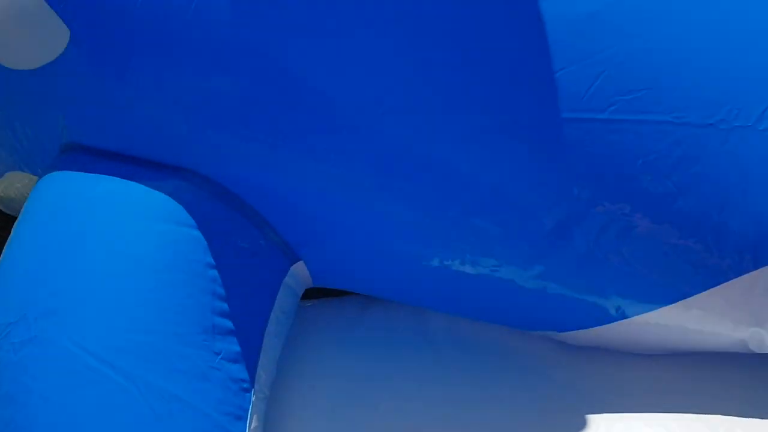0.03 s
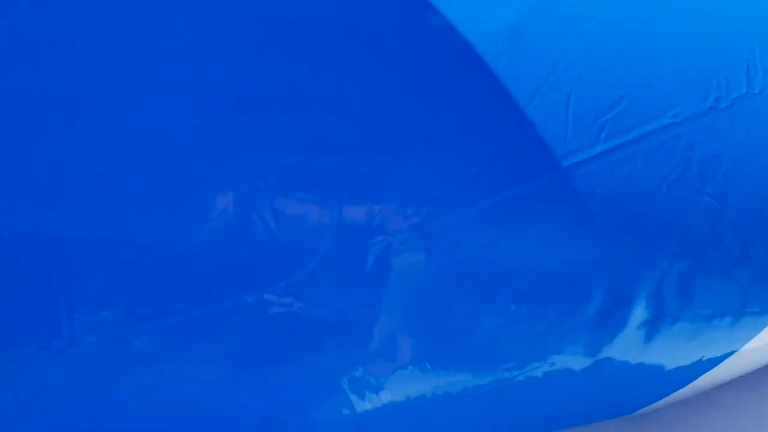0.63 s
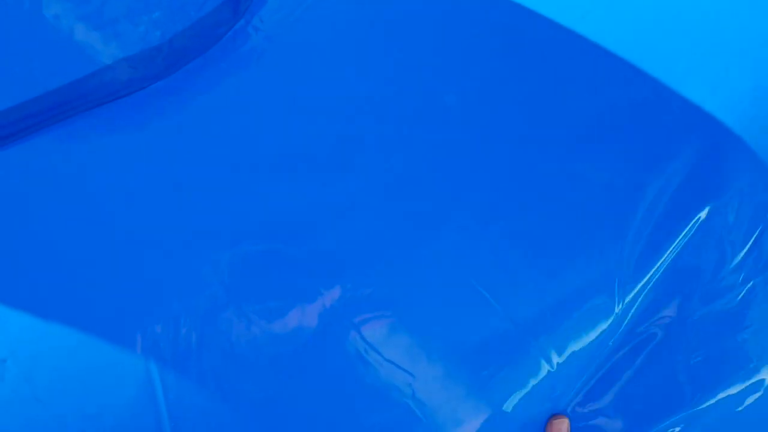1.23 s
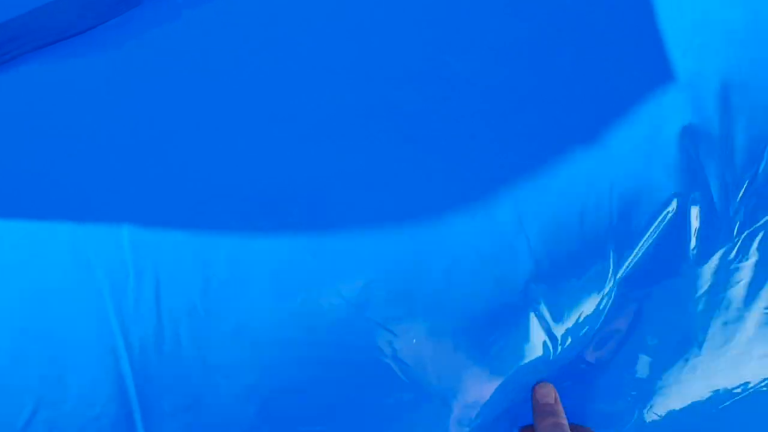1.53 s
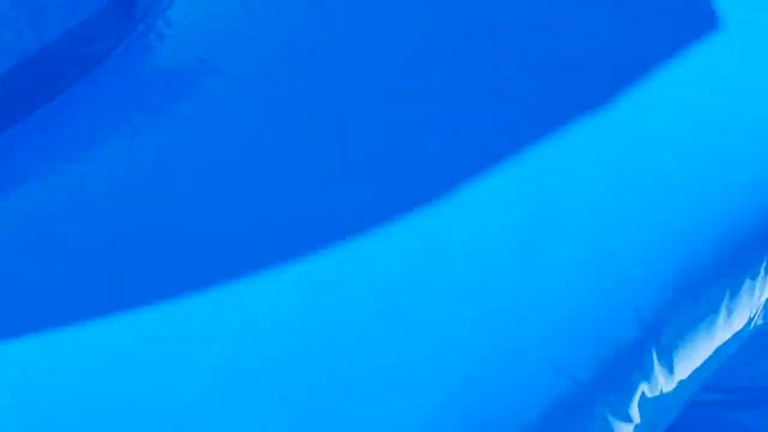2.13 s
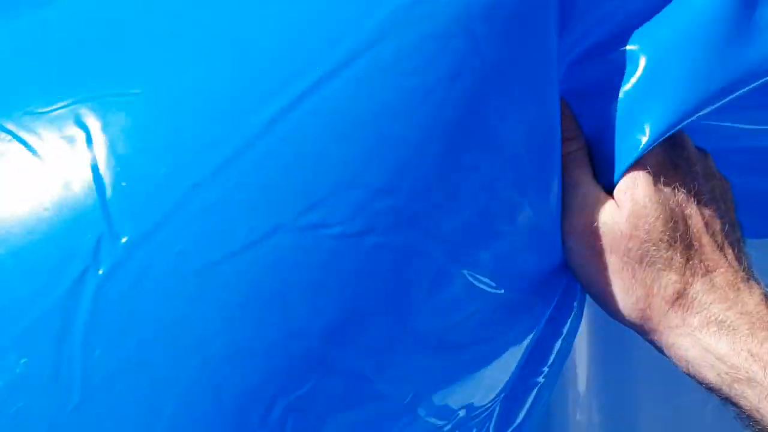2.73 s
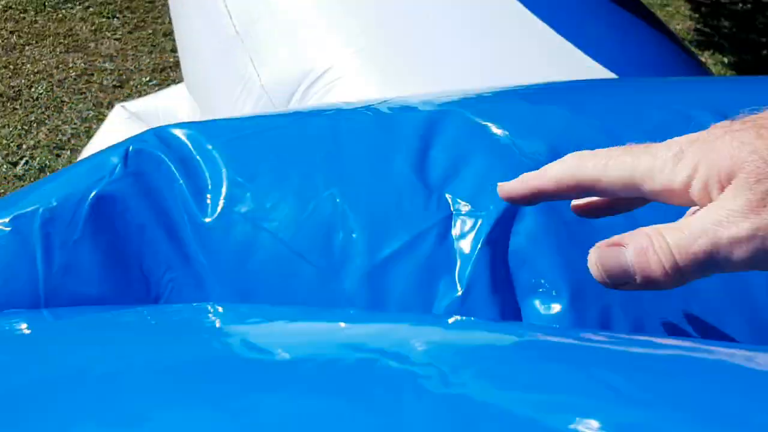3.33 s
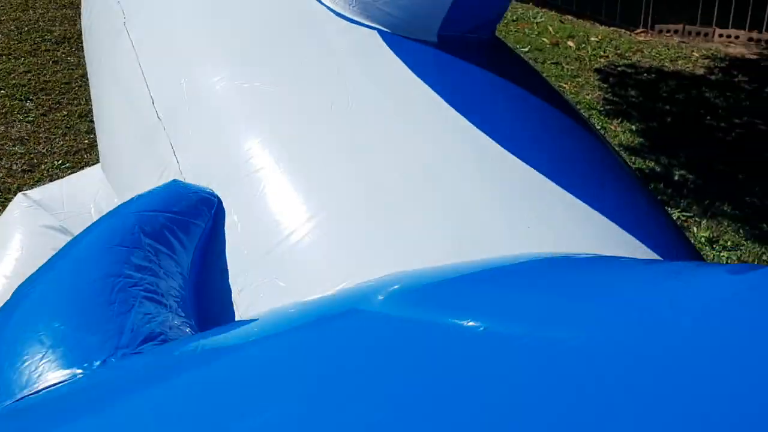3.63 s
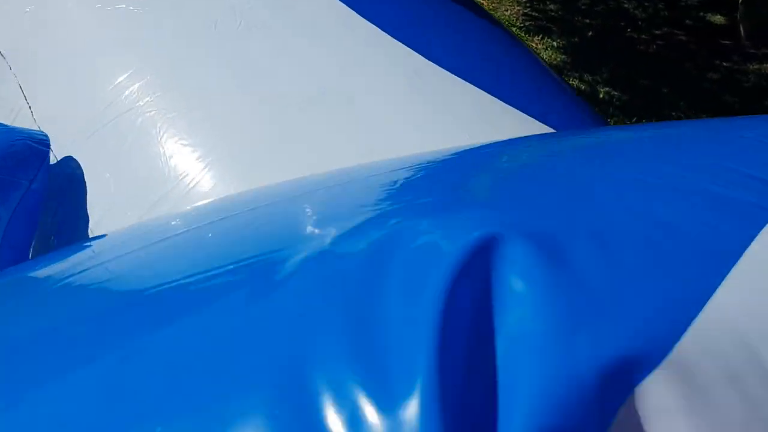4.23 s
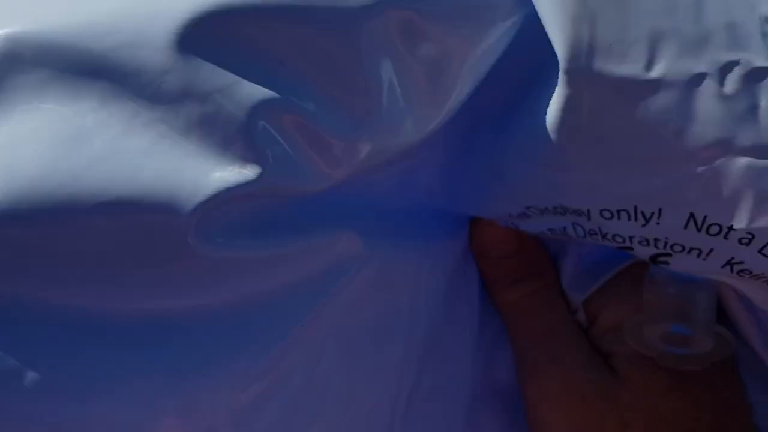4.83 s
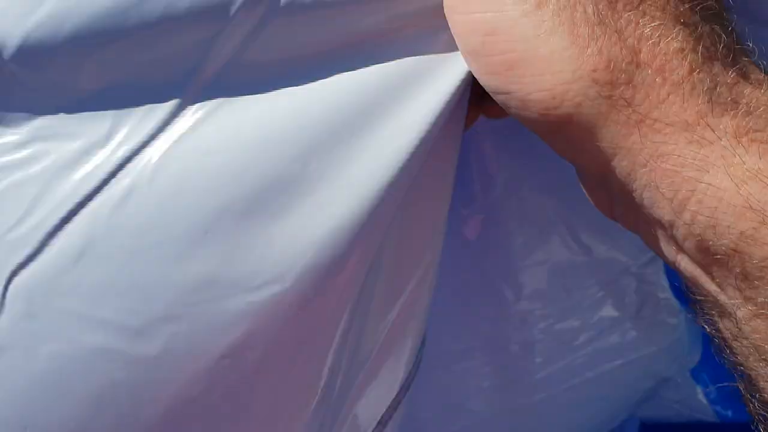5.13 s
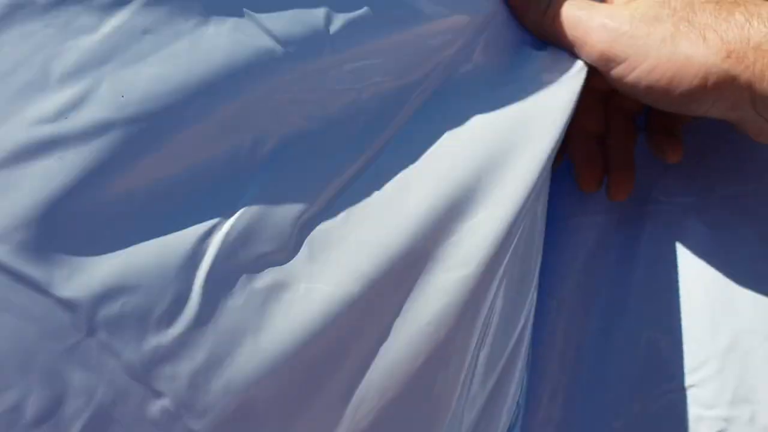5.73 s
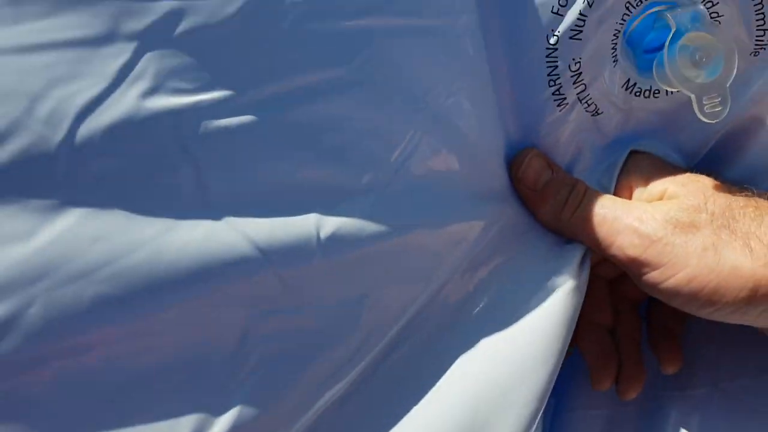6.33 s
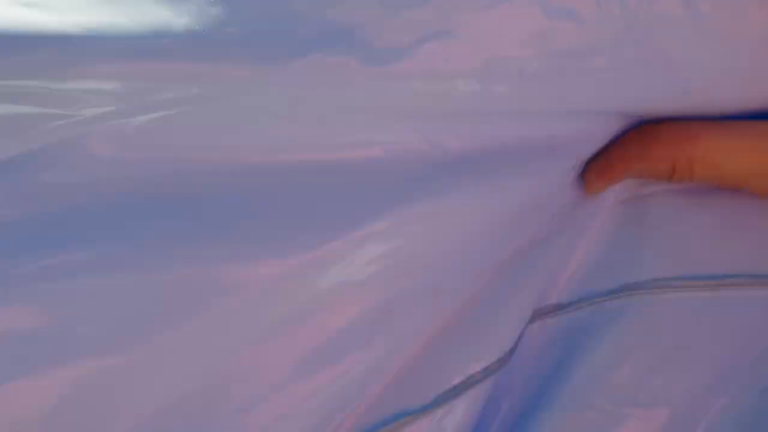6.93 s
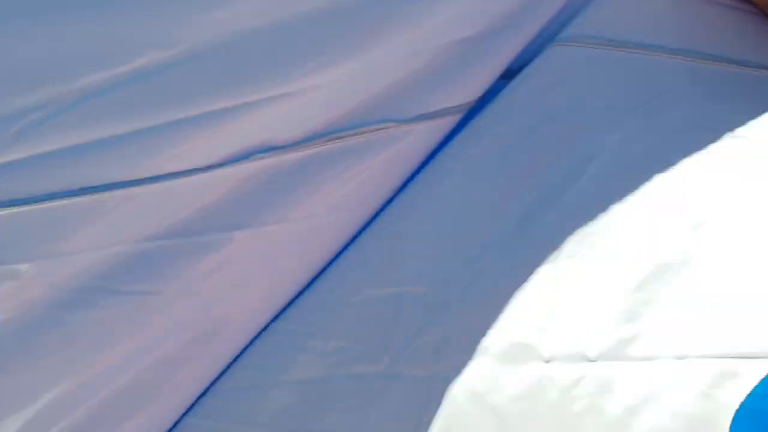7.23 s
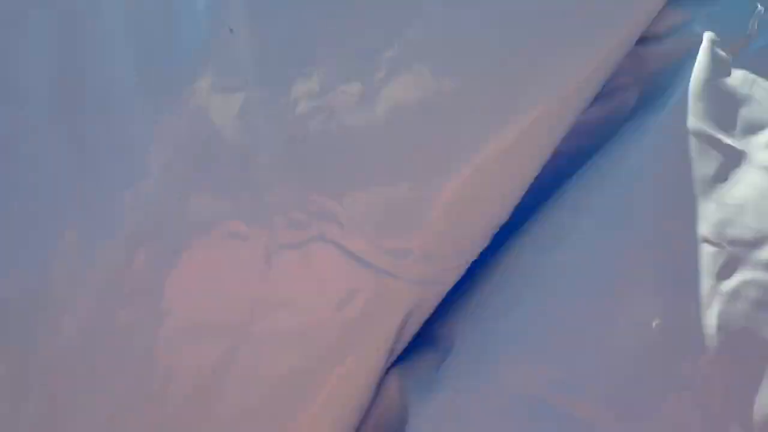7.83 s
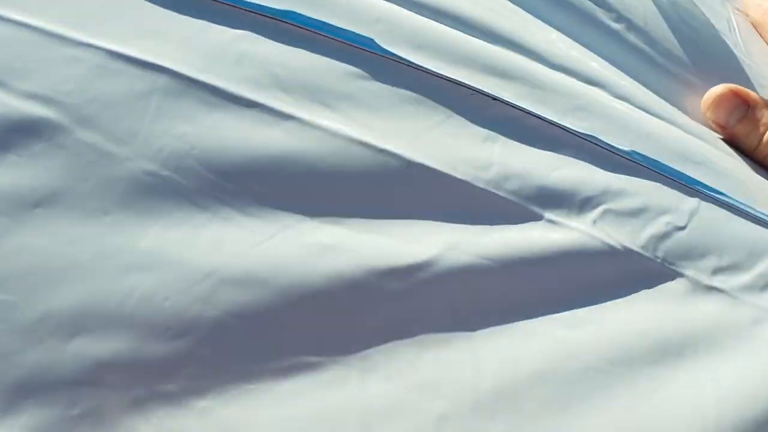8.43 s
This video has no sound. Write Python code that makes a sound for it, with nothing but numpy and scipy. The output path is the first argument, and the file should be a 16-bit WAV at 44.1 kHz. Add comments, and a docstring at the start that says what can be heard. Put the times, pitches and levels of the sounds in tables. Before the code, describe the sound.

A hand presses and drags slack inflatable vinyl outdoors: close rustling, cracking folds, bright squeaks and dull thumps over a light wind rumble.

```python
"""On a lawn, a hand presses, drags and pulls slack vinyl inflatables close to two microphones.
The vinyl skin hisses and crinkles as it rubs, flutters as it moves and thuds softly when bumped.
Folds snap through with a crack and a thump, and bunched wrinkles crunch. Gripped vinyl sticks and
slips, making a bright squeak or a low groan. Light wind buffets the microphones."""
import sys
import numpy as np
from scipy import signal
from scipy.fft import rfft, irfft
from scipy.io import wavfile
from scipy.ndimage import uniform_filter1d

SR = 44100
rng = np.random.default_rng(int(sys.argv[2]) if len(sys.argv) > 2 else 0)


def inscribe(sig):
    """Save sig as 16-bit PCM at rate SR to the path in sys.argv[1].

    A 1-D sig is mono; a 2-D sig holds one channel per row.
    Samples are clipped to [-1, 1] before scaling.
    """
    pcm = np.round(np.clip(np.atleast_2d(sig).T, -1, 1) * 32767)
    wavfile.write(sys.argv[1], SR, pcm.astype(np.int16))


N = 378378

# Levels in a table compare its rows with each other. A hold is counted from the start.
# gusts, most hitting one microphone: (start [s], hold [s], level [dB], left minus right [dB])
GUSTS = [(0, 0.23, -34.5, 4.5), (1.194, 0.076, -26, -35), (1.342, 0.21, -35.5, 23),
         (1.759, 0.049, -29.5, 30), (3.517, 0.12, -35.5, 56), (6.165, 0.031, -26, 35),
         (6.343, 0.69, -30, 9.5)]
# pushes and pulls of the hand; slack skin flutters more than tight skin:
# (start [s], hold [s], time to fade by 20 dB [s], rub level [dB], flutter above the rub [dB])
STROKES = [(0.59, 0.26, 0.54, -46.5, 0.5), (1.248, 0.63, 4.5, -51.5, 4), (1.985, 0.51, 0.42, -53, 12.5),
           (2.18, 0.44, 1.8, -40.5, -1), (3.05, 0.15, 0.88, -42, 5.5), (3.477, 0.066, 1.13, -40, 7),
           (3.98, 0.97, 1.86, -41, 2.5), (5.519, 0.16, 1.02, -39, 0.5), (6.548, 0.45, 2.1, -44, 8.5),
           (7.522, 0.034, 1.6, -39, 2)]
# light, fast brushes over the skin: (middle [s], half-length [s], level [dB])
BRUSHES = [(1.368, 0.12, -47), (2.154, 0.13, -42.5), (2.87, 0.16, -50.5), (3.245, 0.064, -42.5),
           (3.56, 0.016, -34.5), (3.712, 0.28, -48.5), (5.1, 0.16, -40), (6.853, 0.064, -40.5),
           (7.246, 1, -55.5), (7.588, 0.17, -47)]
# the whole body buckling: (start [s], hold [s], level [dB])
BUCKLES = [(6.65, 0.22, -26.5), (6.917, 0.11, -25.5), (7.1, 0.063, -29.5), (7.891, 0.63, -33)]
# the notes an air-filled tube rings at when scuffed: (pitch [Hz], level [dB])
TUBE_NOTES = [(1750, 0), (2220, 2), (3310, -4)]
# folds snapping through: (time [s], crack level [dB], crack pitch [Hz], thump level [dB])
FOLDS = [(0.899, -25, 5400, -30), (1.412, -31, 890, -45), (1.761, -28.5, 830, -24.5),
         (2.3412, -13.5, 3600, -25.5), (3.2062, -9.5, 2820, -32), (3.3148, -16, 870, -30),
         (4.144, -20, 1820, -63), (4.213, -19, 1690, -23.5), (4.238, -23.5, 1560, -33),
         (4.326, -22, 2040, -41), (4.3486, -16.5, 2470, -20), (4.3629, -17.5, 1180, -19),
         (4.372, -20, 2480, -21), (4.382, -16, 1940, -18), (4.549, -24.5, 2180, -18),
         (4.5826, -17.5, 1160, -20.5), (4.739, -22, 740, -33), (4.799, -27.5, 890, -24.5),
         (4.884, -7, 1590, -17.5), (4.9025, -8.5, 2700, -53), (4.9507, -14.5, 2660, -21.5),
         (5.01, -14.5, 2210, -23.5), (5.101, -15, 2470, -28), (6.479, -20.5, 2660, -24.5),
         (6.6232, -11, 2430, -6.5), (6.868, -18.5, 1170, -13.5), (6.88, -19, 2400, -29),
         (7.1504, -19.5, 1040, -15.5), (7.2069, -10.5, 890, -16), (7.262, -12, 960, -13),
         (7.362, -10.5, 1250, -11), (7.458, -15.5, 1120, -11.5), (7.5695, -13.5, 1030, -8.5),
         (7.6115, -10.5, 1170, -9), (7.6318, -16.5, 965, -16.5), (7.927, -17, 2800, -19)]
# the hand and loose folds bumping the skin: (time [s], level [dB], pitch [Hz])
BUMPS = [(0.908, -26, 170), (1.823, -21, 143), (5.995, -14.5, 253), (6.763, -12.5, 155),
         (6.802, -13.5, 150), (7.01, -14, 144), (8.015, -15, 156), (3.886, -17.5, 130)]
# bunches of wrinkles being crushed: (start [s], length [s], level [dB], middle pitch [Hz])
CRUNCHES = [(2.176, 0.098, -46.5, 1030), (2.3262, 0.0052, -39, 3420), (2.354, 0.026, -43.5, 3500),
            (3.078, 0.042, -54, 1660), (3.164, 0.045, -47.5, 3700), (3.627, 0.03, -44, 440),
            (4.956, 0.082, -48, 2760), (5.139, 0.06, -43.5, 3020)]
# a stretched fold dragging over the body:
# (start [s], length [s], first rate [slips/s], last rate [slips/s], level [dB])
FOLD_DRAGS = [(3.087, 0.038, 340, 360, -29.5), (8.2085, 0.014, 134, 390, -22),
              (8.2577, 0.055, 215, 254, -23.5), (8.3111, 0.043, 212, 135, -22.5),
              (8.3605, 0.039, 81, 75, -23.5), (8.403, 0.041, 133, 89, -24.5),
              (8.4662, 0.048, 250, 41, -25.5), (8.5525, 0.026, 56, 71, -24.5)]
# a thumb dragging over tight vinyl:
# (start [s], length [s], first rate [slips/s], last rate [slips/s], level [dB])
THUMB_DRAGS = [(5.172, 0.035, 213, 222, -22.5), (5.281, 0.032, 126, 28, -28), (5.412, 0.031, 86, 200, -28),
               (5.628, 0.06, 120, 350, -28), (5.686, 0.029, 170, 387, -21), (5.7198, 0.033, 450, 580, -24),
               (5.754, 0.038, 550, 307, -24.5), (5.8386, 0.045, 175, 280, -20.5),
               (5.893, 0.001, 1420, 1400, -20), (5.922, 0.032, 78, 170, -19), (5.958, 0.047, 315, 240, -19),
               (6.078, 0.04, 66, 200, -26), (6.242, 0.032, 110, 41, -28.5)]
# the notes of the tight skin around the thumb: (pitch [Hz], level [dB])
SKIN_NOTES = [(1160, -20), (2440, -19)]
# the patch under the thumb, higher when pulled tighter: (time [s], pitch [Hz], level [dB])
THUMB_PATCH = [(5.65, 4400, 5.5), (5.72, 5360, 14), (5.791, 5800, 13.5), (5.84, 5340, -7.5)]
# the notes of the blown-up body's air and skin, rung by the squeak: (pitch [Hz])
BODY_NOTES = [3778, 4003, 4265, 4579, 4635, 4951, 5373, 5860]

# A colour says how strong a sound is from bass to treble.
# wind on the microphones: (frequency [Hz], level [dB])
WIND_COLOUR = [(15, -17), (62, 5.5), (125, 2.5), (210, -7), (1500, -77.5)]
# skin sliding on skin: (frequency [Hz], level [dB])
RUB_COLOUR = [(150, 2.5), (400, 9), (1200, 3.5), (2200, 3), (4600, 3), (8500, -6.5), (15000, -44)]
# the airy hiss of brushed skin: (frequency [Hz], level [dB])
HISS_COLOUR = [(2000, 8.8), (5000, 10.5), (12000, 11.5), (16000, 5)]
# slack vinyl flapping and buckling: (frequency [Hz], level [dB])
FLUTTER_COLOUR = [(40, -10), (90, 4), (260, -1), (650, -18.5), (4000, -51)]
# one slip of a stretched fold: (frequency [Hz], level [dB])
GROAN_COLOUR = [(50, -7), (190, 21.5), (450, 11.5), (800, 13.5), (1400, 0), (2400, -14.5)]
# one slip of the thumb: (frequency [Hz], level [dB])
SQUEAK_COLOUR = [(300, 5), (900, 5), (1400, -5.5), (2400, -6.5), (3300, -13), (3900, 2.5), (7300, 2.5),
                 (9200, -8.5), (15000, -7.5)]
# the left microphone faces the hand and hears more: (frequency [Hz], left minus right [dB])
LEFT_BOOST = [(650, 1.5), (2200, 6.5), (4400, 7.5), (8000, 1)]


def gain(db):
    """Turn decibels into a number to multiply by."""
    return 10 ** (np.asarray(db) / 20)


def unit(x):
    """Scale a signal so that its average power is 1."""
    return x / np.sqrt(np.mean(x ** 2))


def coloured_click(colour, size=4096):
    """A click with the given colour; passing a sound through it gives the sound that colour."""
    hz, db = np.transpose(colour)
    freqs = np.maximum(np.arange(size // 2 + 1) * SR / size, 1)
    cepstrum = irfft(np.log(gain(np.interp(np.log(freqs), np.log(hz), db))))
    cepstrum[1:size // 2] *= 2  # these two lines pack the energy at the start of the click
    cepstrum[size // 2 + 1:] = 0
    return irfft(np.exp(rfft(cepstrum)))


def ring(x, response):
    """Let every sample of x set off its own copy of the response (convolution)."""
    return signal.oaconvolve(np.atleast_2d(x), np.atleast_2d(response), axes=1)[:, :N]


def band(x, hz, spread):
    """Gently keep the frequencies from hz / spread to hz * spread."""
    edges = [hz / spread, min(hz * spread, .45 * SR)]
    return signal.sosfilt(signal.butter(1, edges, "band", fs=SR, output="sos"), x)


def low(x, hz, order=2):
    """Keep the frequencies below hz."""
    return signal.sosfilt(signal.butter(order, hz, fs=SR, output="sos"), x)


def waver(per_s, depth_db):
    """A gain that wanders smoothly at random, with its highest peaks held back."""
    step = int(SR / per_s)
    targets = np.minimum(rng.standard_normal(N // step + 1), 2.1)
    return gain(depth_db * unit(uniform_filter1d(np.repeat(targets, step)[:N], step)))


def grains(per_s, spread_db):
    """Tiny clicks at random times, many weak and a few strong."""
    when, luck, side = rng.random((20000, 3))[:int(per_s * N / SR)].T
    out = np.zeros(N)
    out[(when * N).astype(int)] = gain(spread_db * np.minimum(-np.log(luck), 4)) * np.sign(side - .5)
    return out


def stereo_noise(shared_hz):
    """Noise whose bass is the same at both microphones and whose treble is different."""
    freqs = np.arange(N // 2 + 1) * SR / N
    shared = 1 / (1 + (freqs / shared_hz) ** 2)
    spectra = rfft(rng.standard_normal((3, N)))
    return irfft(spectra[2] * np.sqrt(shared) + spectra[:2] * np.sqrt(1 - shared), N)


def add(out, start_s, x):
    """Mix x into out, beginning at start_s."""
    i = max(int(start_s * SR), 0)
    out[:, i:i + x.shape[-1]] += x[..., :max(N - i, 0)]


def scatter(direct_db, fade_s, size=1024):
    """A click and its quick echoes among the folds, different at each microphone."""
    echoes = rng.standard_normal((2, size)) * np.exp(-np.arange(size) / SR / fade_s)
    echoes /= np.sqrt(np.sum(echoes ** 2, axis=1, keepdims=True))
    echoes[:, 0] += gain(direct_db)
    return echoes


def swells(events, rise_s):
    """A loudness curve from rows of (start [s], hold [s], time to fade by 20 dB [s], level [dB])."""
    t = np.arange(0, N, 32) / SR
    power = 0
    for start, hold, fade, db in events:
        rise = np.clip((t - start) / rise_s, 0, 1)
        fall_db = 20 * np.maximum(t - start - hold, 0) / fade
        power += (rise * gain(db - fall_db)) ** 2
    return np.interp(np.arange(N) / SR, t, np.sqrt(power))


def wind(breeze_db=-47.5, fade_s=.11):
    """Swirls of air hit each microphone separately: a light breeze, plus gusts that favour one side."""
    gusts = []
    for side in (1, -1):
        events = [(start, hold, fade_s, db + 20 * np.log10(2 / (1 + gain(-side * lean_db))))
                  for start, hold, db, lean_db in GUSTS]
        gusts.append(swells(events, rise_s=.0065))
    swirls = rng.standard_normal((2, N)) * waver(per_s=16, depth_db=4.2)
    return np.hypot(gusts, gain(breeze_db)) * unit(ring(swirls, coloured_click(WIND_COLOUR)))


def rubbing(rest_db=-54):
    """Skin slides on skin: a smooth rub, ticking wrinkles and a hiss that swells with each brush."""
    t = np.arange(N) / SR
    strokes = swells([(start, hold, fade, db) for start, hold, fade, db, _ in STROKES], rise_s=.02)
    effort = np.hypot(strokes, gain(rest_db))
    brushes = sum(gain(db) * np.exp(-((t - middle) / half) ** 2) for middle, half, db in BRUSHES)
    hiss_level = np.hypot(gain(-11.5) * effort, brushes) + gain(-67)
    slide = unit(stereo_noise(shared_hz=1100) * waver(per_s=30, depth_db=2))
    # each size of wrinkle ticks at its own pitch, and the ticks come in clusters
    wrinkles = sum(band(grains(per_s=170, spread_db=6.3), hz, spread=1.5)
                   for hz in np.geomspace(1200, 12000, 6))
    clusters = wrinkles * waver(per_s=18, depth_db=4)
    ticks = unit(ring(clusters, scatter(direct_db=6, fade_s=.0008)))
    crinkle = unit(ring(slide + gain(-8) * ticks, coloured_click(RUB_COLOUR)))
    hiss = unit(ring(rng.standard_normal((2, N)) + gain(-7) * ticks, coloured_click(HISS_COLOUR)))
    return effort * crinkle + gain(1) * hiss_level * hiss * waver(per_s=25, depth_db=1.3)


def flutter_and_rumble():
    """Slack vinyl flaps softly as the hand moves it, and rumbles when the whole body buckles."""
    strokes = [(start, hold, fade, db + extra_db) for start, hold, fade, db, extra_db in STROKES]
    shake = np.hypot(swells(strokes, rise_s=.02), gain(-54.5))  # untouched vinyl still stirs a little
    buckling = swells([(start, hold, .036, db) for start, hold, db in BUCKLES], rise_s=.0096)
    soft_flap = coloured_click(FLUTTER_COLOUR)
    flaps = unit(grains(per_s=140, spread_db=3)) + gain(-9) * rng.standard_normal((2, N))
    flutter = unit(ring(flaps * waver(per_s=22, depth_db=2.36), soft_flap))
    rumble = unit(ring(stereo_noise(shared_hz=218), soft_flap) * waver(per_s=24, depth_db=4))
    return gain([[1], [-1]]) * (shake * flutter + buckling * rumble)


def scuff(middle_s=.65, half_length_s=.034):
    """A brief slide swells and fades, ringing the hollow notes of an air-filled tube."""
    t = np.arange(N) / SR
    friction = rng.standard_normal((2, N))
    hollow = sum(gain(db) * band(band(friction, hz, spread=1.05), hz, spread=1.05)
                 for hz, db in TUBE_NOTES)
    return gain(-43.5) * unit(hollow) / (1 + ((t - middle_s) / half_length_s) ** 2)


def crack(t, hz, fade_s=.0035):
    """A fold flips over in one sharp swing at t = 0, and the skin beside it rings and rattles."""
    after = np.maximum(t, 0)
    swing = np.real(np.exp(-1j * rng.uniform(1.8, 2.5)) / (1 - 1.604j * hz * t) ** 4)
    click = swing + gain(-10) * np.exp(-(t * SR) ** 2)  # the sharp edge of the crease ticks
    # the fold's far side follows, then the tube's far wall: each snap gets its own hollow colour
    click -= rng.uniform(.1, .4) * np.roll(click, int(SR * rng.uniform(.7, 1.3) / hz))
    click -= rng.uniform(.1, .3) * np.roll(click, int(SR * rng.uniform(.002, .005)))
    notes_hz = hz * rng.uniform([.6, 1, 1.4], [.9, 1.3, 2])
    notes = np.sin(2 * np.pi * np.outer(notes_hz, after)).sum(axis=0)
    rattle = unit(band(rng.standard_normal((2, len(t))), hz, spread=3.2)) * (t > 0)
    return click + (gain(-20) * notes + gain(-15) * rattle) * np.exp(-after / fade_s)


def thump(t, hz, ring_s=.019, rise_s=.0018):
    """The skin sounds its two lowest notes like a drum, tuned a little differently each time."""
    after = np.maximum(t, 0)
    phase = 2 * np.pi * hz * np.exp(.1 * rng.standard_normal()) * after
    notes = np.sin(phase) + gain(-9.5) * np.sin(1.5 * phase)
    thud = notes * gain(-60 * after / ring_s) * (1 - np.exp(-after / rise_s))
    return thud - low(thud, 41, order=1)  # a small patch of skin gives off little deep bass


def snaps(lead_s=.003):
    """Each fold that snaps through makes a crack and thumps the skin."""
    out = np.zeros((2, N))
    t = np.arange(4096) / SR - lead_s
    for when, crack_db, crack_hz, thump_db in FOLDS:
        # tighter skin cracks harder and rings higher
        thump_hz = np.interp(crack_db - thump_db, [-20, 0], [130, 255])
        snap = gain(crack_db) * crack(t, crack_hz) + gain(thump_db + 9.5) * thump(t, thump_hz)
        add(out, when - lead_s, snap)
    return out


def bumps(half_length_cycles=.62):
    """A soft push swings the skin briefly to and fro, without a crack."""
    out = np.zeros((2, N))
    t = np.arange(-2048, 2048) / SR
    for when, db, hz in BUMPS:
        swing = np.sin(2 * np.pi * (hz * t + rng.random()))
        swell = np.exp(-(hz * t / half_length_cycles) ** 2)
        add(out, when + t[0], gain(db) * swing * swell)
    return out


def crunches():
    """Crushed wrinkles give short, dense bursts of crackle."""
    out = np.zeros((2, N))
    crackle = ring(grains(per_s=1000, spread_db=2.5), scatter(direct_db=8, fade_s=.002))
    for start, length, db, hz in CRUNCHES:
        burst = band(crackle[:, int(start * SR):int((start + length) * SR)], hz, spread=1.7)
        burst = low(burst, hz * 1.6) * signal.windows.tukey(burst.shape[1], .4)
        add(out, start, gain(db + 10.5) * unit(burst))
    return out


def slips(drags, jitter, uneven_db, weaken_db):
    """Vinyl sticks and lets go, one kick per slip; along a drag the rate glides and the grip weakens."""
    kicks = np.zeros(N)
    for start, length, first_rate, last_rate, db in drags:
        t = 0
        for lateness, strength in rng.standard_normal((200, 2)):
            if t > length or (start + t) * SR >= N:
                break
            progress = t / length
            kicks[int((start + t) * SR)] = gain(db - weaken_db * progress ** 2 + uneven_db * strength)
            rate = first_rate * (last_rate / first_rate) ** progress
            t += np.exp(jitter * lateness) / rate
    return kicks


def groan():
    """The soft slips of a stretched fold shake the whole skin in low pulses."""
    pulse = coloured_click(GROAN_COLOUR)
    kicks = slips(FOLD_DRAGS, jitter=.055, uneven_db=1.6, weaken_db=1.5)
    return gain(2) * ring(kicks, pulse / np.abs(pulse).max())


def squeak(skin_ring_s=.027, body_ring_s=.32):
    """Each slip of the thumb is a bright tick and a scrape that leave the skin and the body ringing."""
    spectrum = rfft(coloured_click(SQUEAK_COLOUR))
    freqs = np.linspace(0, SR / 2, len(spectrum))
    tick = irfft(spectrum * np.exp(-.4j * np.sqrt(freqs)))  # in bending skin, treble outruns bass
    kicks = slips(THUMB_DRAGS, jitter=.11, uneven_db=1.8, weaken_db=3)
    t = np.arange(16384) / SR
    scrape = gain(-19) * ring(kicks, np.exp(-t / .0012)) * rng.standard_normal((2, N))
    ticks = gain(5) * ring(kicks + scrape, tick / np.abs(tick).max())
    skin_notes = sum(gain(db) * np.sin(2 * np.pi * hz * t) for hz, db in SKIN_NOTES)
    skin = ring(kicks, skin_notes * gain(-60 * t / skin_ring_s))
    direct = ticks + skin + screech(kicks)
    body_notes = np.mean([np.sin(2 * np.pi * (hz * t + rng.random((2, 1)))) for hz in BODY_NOTES], axis=0)
    body = ring(direct, body_notes * gain(-60 * t / body_ring_s))
    return (direct + gain(-44) * body) * gain([[1], [-5]])


def screech(kicks):
    """Each slip pings the patch under the thumb; the tighter the patch, the higher the ping."""
    out = np.zeros((2, N))
    times, pitches, levels = np.transpose(THUMB_PATCH)
    t = np.arange(128) / SR
    for i in np.flatnonzero(kicks):
        when = i / SR
        hz = np.interp(when, times, pitches) * np.exp(.06 * rng.standard_normal())
        cycles = hz * t
        swell = cycles ** 2 * np.exp(2 - 2 * cycles)  # peaks after one cycle, rings for a few more
        ping = np.cos(2 * np.pi * (cycles + rng.random())) * swell
        add(out, when, kicks[i] * gain(np.interp(when, times, levels)) * ping)
    return out


def scene():
    """All the vinyl sounds, stronger on the left, over flutter and wind."""
    left, right = rubbing() + snaps() + bumps() + crunches() + scuff() + squeak() + groan()
    left = ring(left, coloured_click([(hz, db / 2) for hz, db in LEFT_BOOST]))
    right = ring(right, coloured_click([(hz, -db / 2) for hz, db in LEFT_BOOST]))
    left = np.roll(left, 2, axis=1)  # two samples later than the right
    return np.vstack([left, right]) + flutter_and_rumble() + wind()


def record(dry, top_hz=16100):
    """Flatten any peaks beyond full scale and cut the very highest treble."""
    treble_cut = signal.ellip(10, .2, 80, top_hz, fs=SR, output="sos")
    return signal.sosfilt(treble_cut, np.clip(dry, -1, 1))


dry = scene()
out = record(dry)
inscribe(out)
```